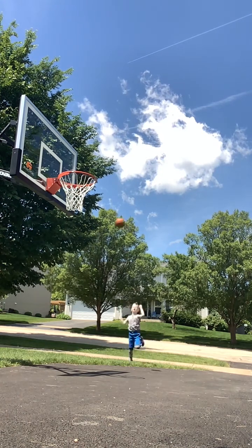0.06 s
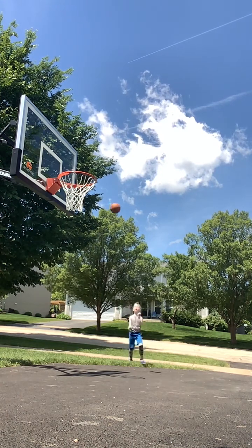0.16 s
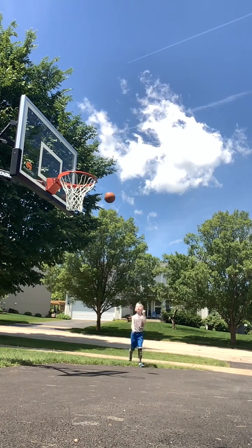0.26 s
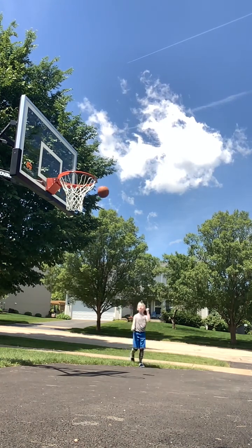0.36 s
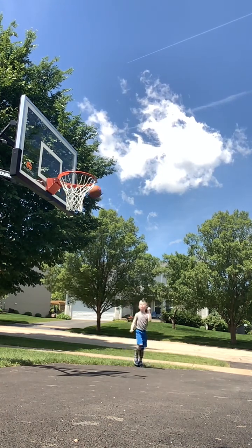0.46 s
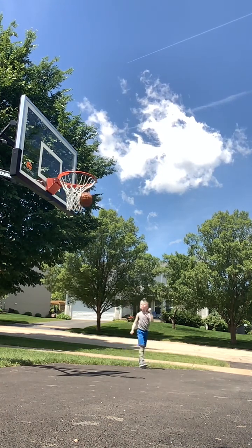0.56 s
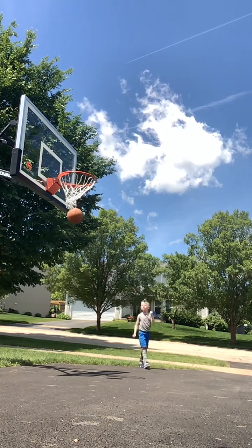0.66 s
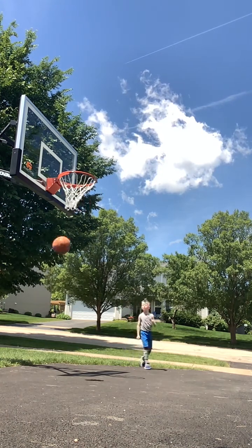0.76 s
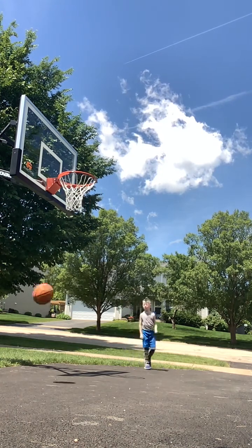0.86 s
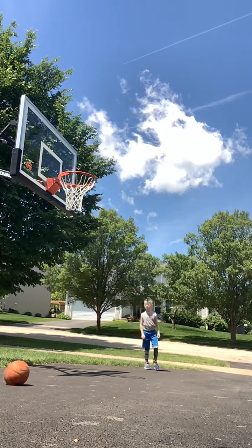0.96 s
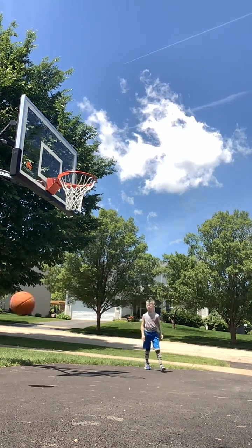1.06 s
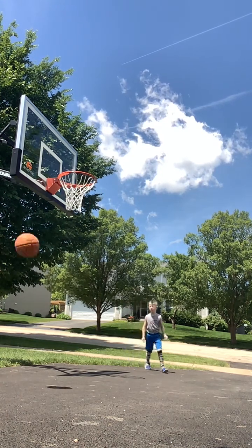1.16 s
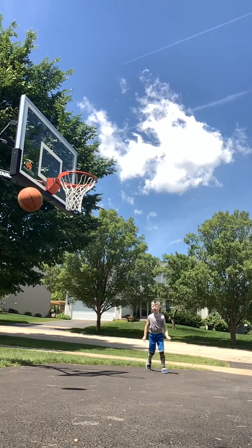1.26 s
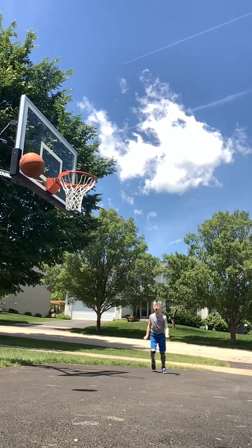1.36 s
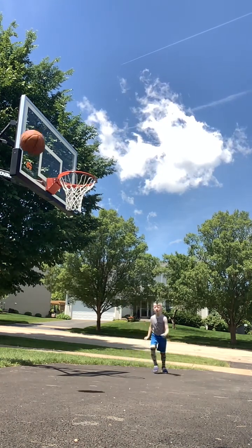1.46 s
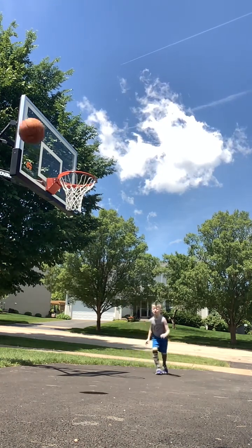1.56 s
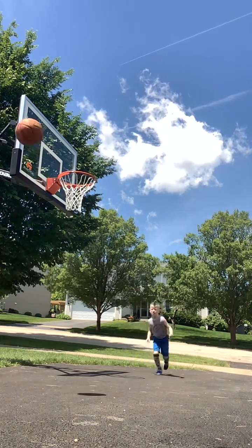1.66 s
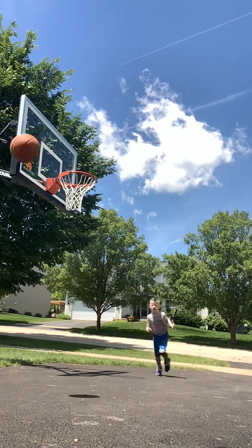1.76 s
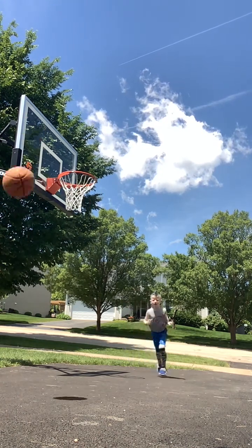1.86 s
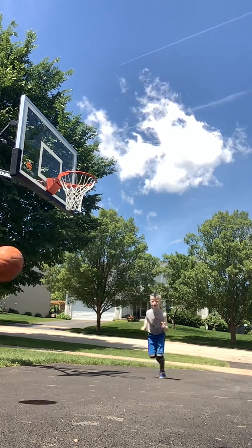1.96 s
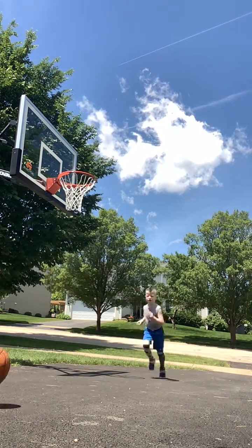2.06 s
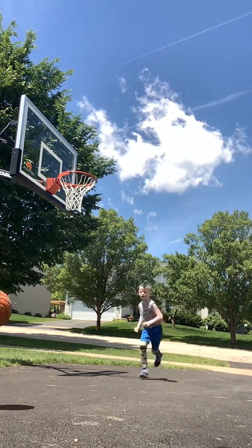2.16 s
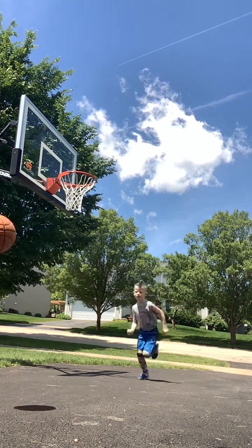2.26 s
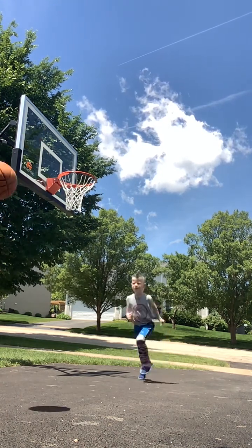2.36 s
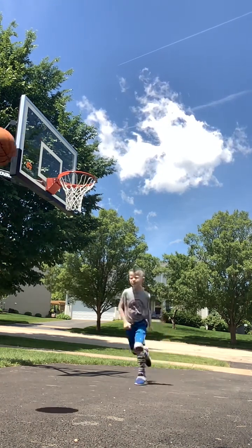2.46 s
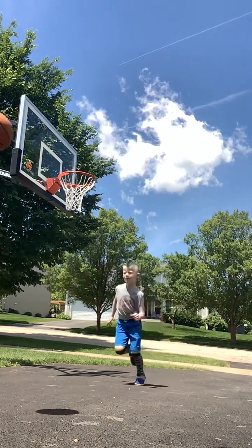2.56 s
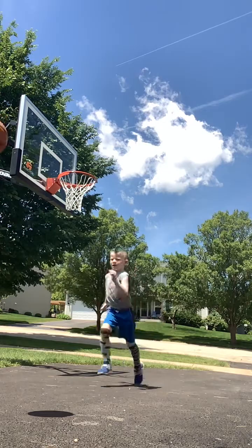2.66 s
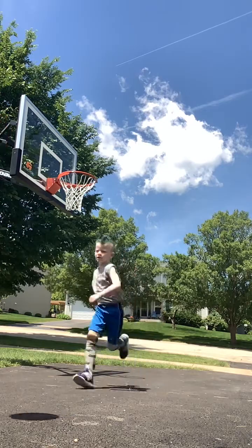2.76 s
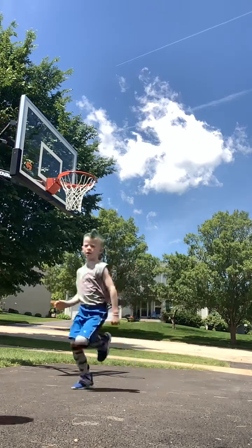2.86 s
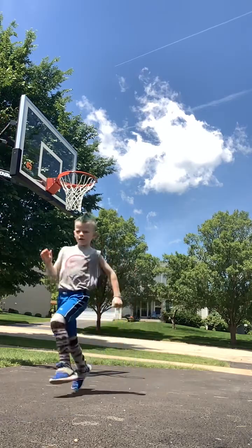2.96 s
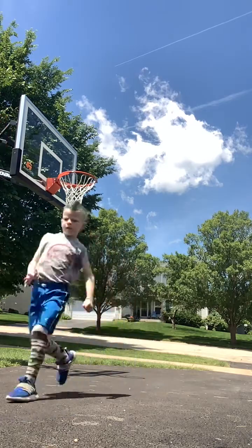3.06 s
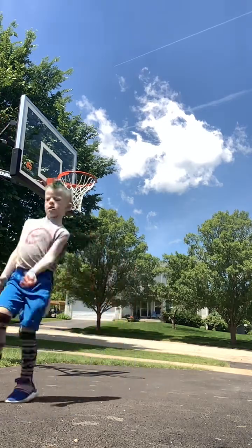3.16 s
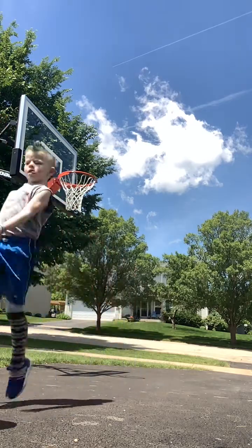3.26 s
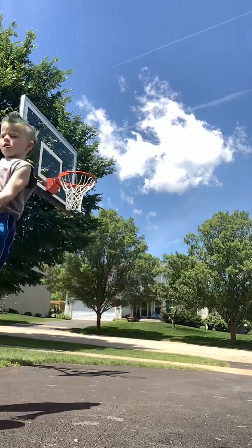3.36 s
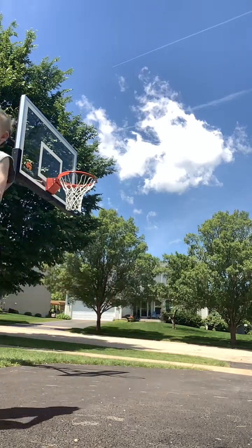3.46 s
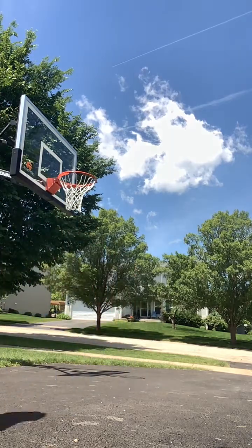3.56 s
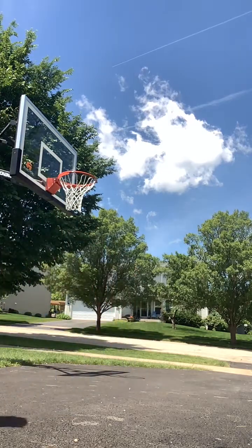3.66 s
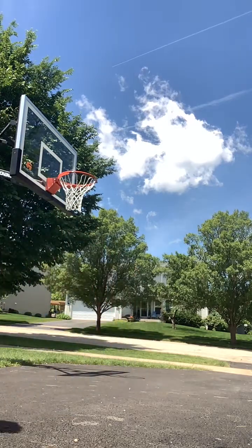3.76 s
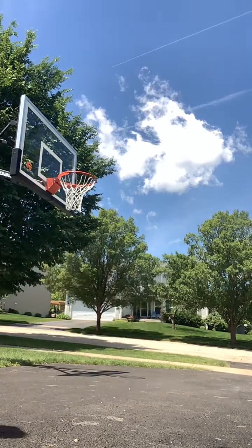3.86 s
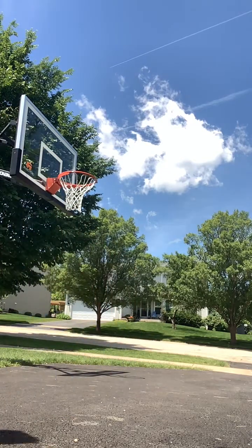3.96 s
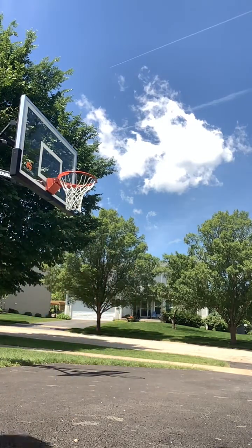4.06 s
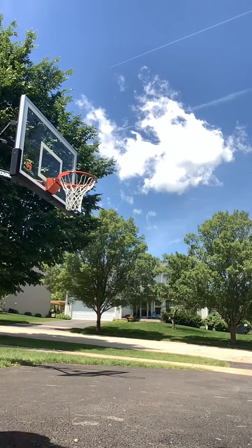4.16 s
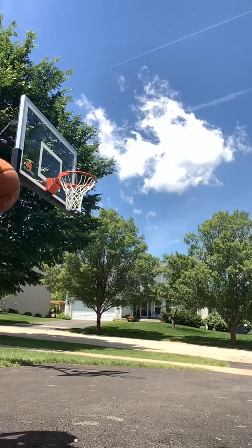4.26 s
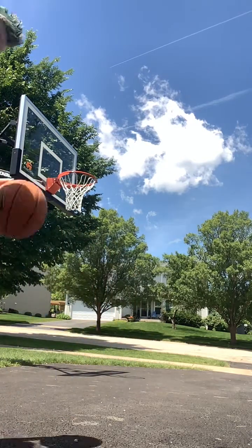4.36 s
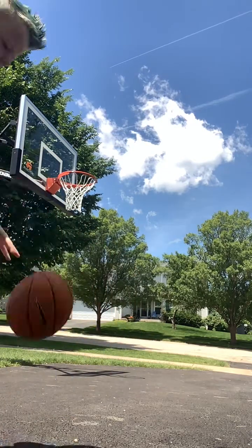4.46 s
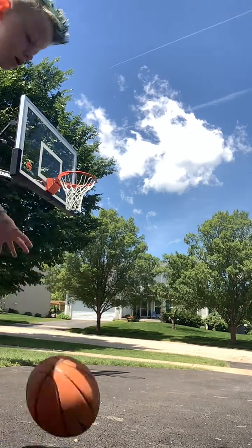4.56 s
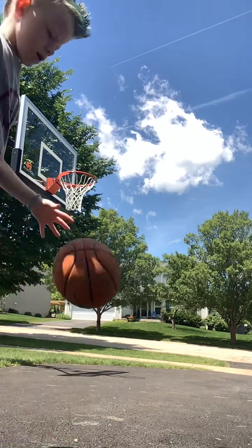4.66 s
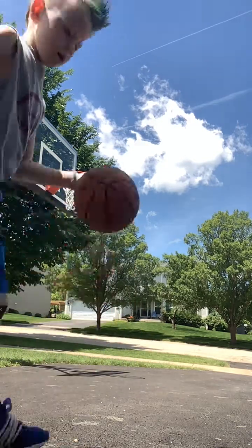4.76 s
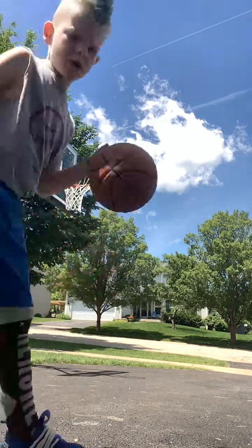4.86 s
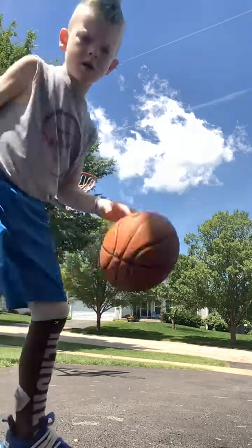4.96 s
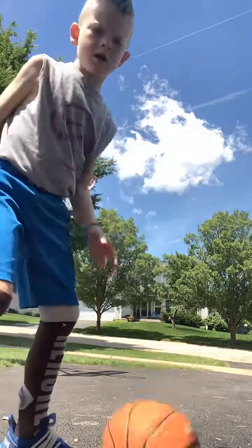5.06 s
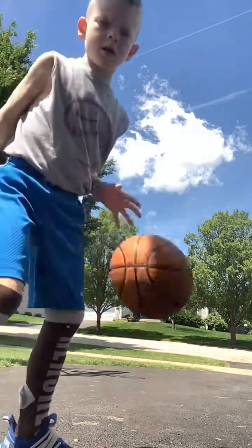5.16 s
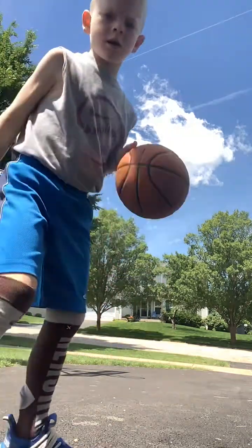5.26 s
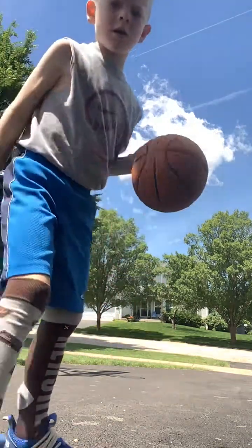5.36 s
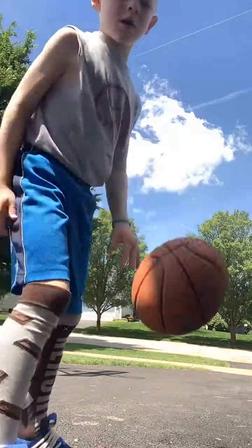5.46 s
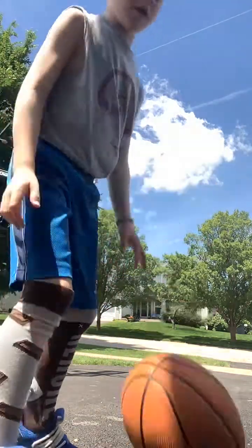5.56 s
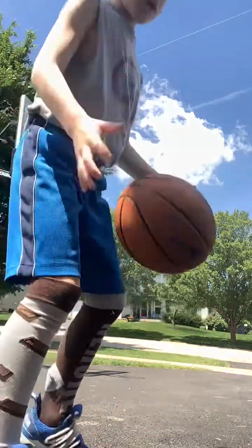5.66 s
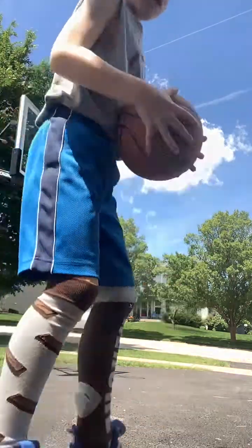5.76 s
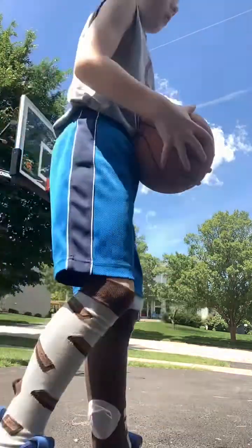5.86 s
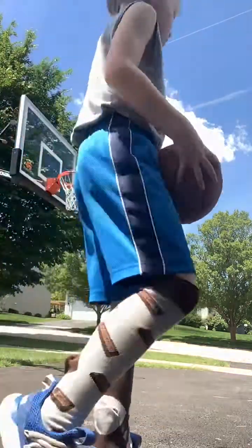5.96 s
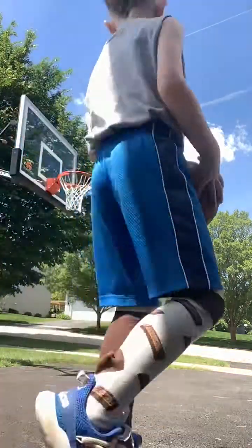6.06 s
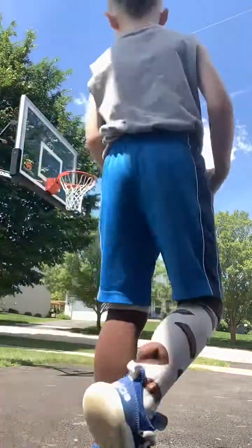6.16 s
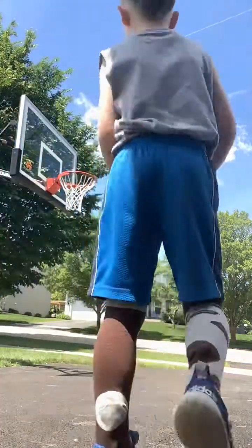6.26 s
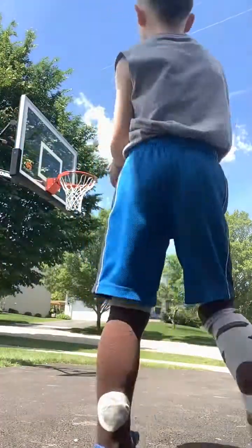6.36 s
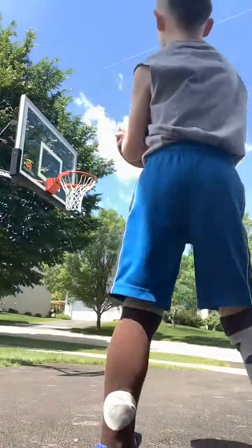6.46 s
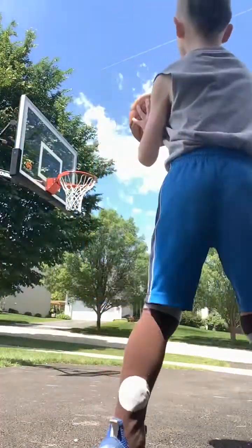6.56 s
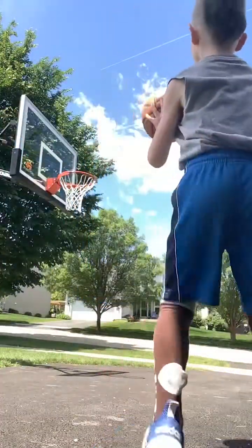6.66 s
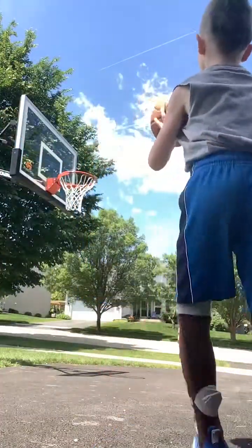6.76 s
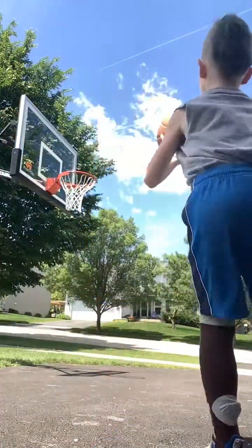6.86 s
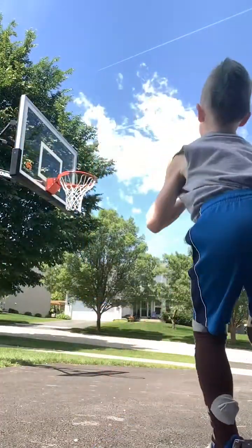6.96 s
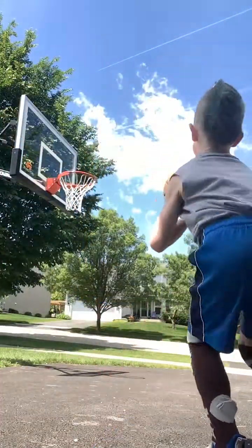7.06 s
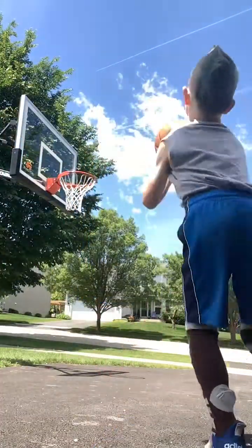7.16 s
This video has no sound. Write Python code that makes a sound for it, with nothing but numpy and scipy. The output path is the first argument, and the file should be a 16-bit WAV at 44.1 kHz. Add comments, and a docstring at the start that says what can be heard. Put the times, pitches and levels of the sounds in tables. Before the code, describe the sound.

A close microphone near the ground hears a basketball landing loudly on asphalt, first in spaced bounces, then in faster dribbles half a second apart. Between them come grit ticks, light footfalls, a gritty skid and a sharp sole slap. Palms pat the ball and catch it with a bright smack. Soft steps follow. Behind are thin gliding bird notes, rustling hiss, low distant traffic and a wavering hum.

```python
"""Driveway by a house: a basketball brushes through a net, bounces on asphalt, is dribbled and caught.
Each bounce is a noise slap, a fast falling thump, a hollow ring and a ping of air modes.
Coloured noise bursts make the net, grit, shoes, cloth and hands; noise echoes stand for the house fronts.
Behind: gliding songbird whistles, a soft rustling hiss, distant traffic noise and a faint wavering hum.
"""
import sys
import numpy as np
from scipy import signal
from scipy.fft import rfft, irfft
from scipy.io import wavfile
from scipy.ndimage import uniform_filter1d

SR = 44100
rng = np.random.default_rng(int(sys.argv[2]) if len(sys.argv) > 2 else 0)


def file_out(sig):
    """Save sig as 16-bit WAV at sys.argv[1]."""
    # one column per channel
    cols = np.atleast_2d(sig).T
    # limit, then scale
    lim = np.clip(cols, -1, 1)
    pcm = np.round(lim * 32767).astype(np.int16)
    wavfile.write(sys.argv[1], SR, pcm)


N = 318843
TIME = np.arange(N) / SR  # s, whole scene
AGE = TIME[:int(.7 * SR)]  # s since the start of one event


def undb(db):
    """Decibels to gain."""
    return 10 ** (np.asarray(db) / 20)


def unit(x):
    """Scale to rms 1."""
    return x / np.sqrt(np.mean(x ** 2))


def add(out, start_s, x):
    """Mix a sound in at a time, cut at the end of the buffer."""
    i = int(start_s * SR)
    out[i:i + len(x)] += x[:len(out) - i]


def curve(rows, axis):
    """One column of a timed table, joined by straight lines."""
    columns = np.transpose(rows)
    return np.interp(TIME, columns[0], columns[axis])


def noise(colour, size):
    """Noise of rms 1, its spectrum shaped by (freq_hz, level_db) points on a log frequency axis."""
    hz, db = np.transpose(colour)
    freq_hz = np.maximum(np.fft.rfftfreq(size, 1 / SR), 1)
    gain = undb(np.interp(np.log(freq_hz), np.log(hz), db))
    return unit(irfft(rfft(rng.standard_normal(size)) * gain, size))


def walk(rate_hz, size):
    """Smooth random drift with a spread of about 1: held random values, averaged twice."""
    hold = max(int(SR / rate_hz), 2)
    held = np.repeat(rng.standard_normal(size // hold + 2), hold)
    return unit(uniform_filter1d(uniform_filter1d(held, hold), hold))[:size]


def burst(colour, fade_s, rise_s=1 / 8000, grain_db=0):
    """A contact: coloured noise that rises and dies, with a set energy, lumpy if grainy."""
    shape = (1 - np.exp(-AGE / rise_s)) * np.exp(-AGE / fade_s)
    x = noise(colour, len(AGE)) * shape * undb(grain_db * walk(900, len(AGE)))
    return unit(x) * np.sqrt(np.mean(shape ** 2))


def swell(peak_s):
    """Envelope that grows to 1 at the peak time and dies away."""
    return AGE / peak_s * np.exp(1 - AGE / peak_s)


def ring(freq_hz, t60_s):
    """One struck mode: a sine with exponential decay."""
    return np.sin(2 * np.pi * freq_hz * AGE) * np.exp(-np.log(1000) * AGE / t60_s)


# distant traffic colour: freq_hz, level_db
TRAFFIC_COLOUR = [(24, -62), (40, -19.5), (103, -1), (209, -9.5), (268, -14), (303, -12.5), (332, -19.5),
                  (411, -20), (449, -25), (490, -22), (2110, -36), (2800, -40), (3640, -46), (6160, -120)]
# background level over time: start_s, traffic_db, hum_db (hum before its random waver)
STREET_LEVELS = [(0, -43.5, -57), (.7, -45, -56), (1.5, -44.5, -51.5), (2.6, -44.5, -51), (3.9, -46, -46.5),
                 (5.0, -43, -44.5), (5.9, -42.5, -42), (6.3, -45, -44.5), (7.23, -45, -49)]


def traffic():
    """Distant traffic: mostly low coloured noise with a slowly changing level."""
    return noise(TRAFFIC_COLOUR, N) * undb(curve(STREET_LEVELS, axis=1))


def motor_hum(hum_hz=98):
    """Far motor: three harmonics that waver together in pitch and level."""
    phase = 2 * np.pi * np.cumsum(hum_hz * (1 + 0.023 * walk(4, N))) / SR
    hum = np.sin(phase) + undb(-22) * np.sin(2 * phase) + undb(-21.5) * np.sin(3 * phase)
    return undb(curve(STREET_LEVELS, axis=2) + 2.7 * walk(7, N)) * hum


# rustling hiss colour: freq_hz, level_db
RUSTLE_COLOUR = [(1000, -15.5), (2700, -0.5), (4200, 3), (5500, 0.5), (7000, 0), (8500, -14),
                 (11000, -18.5), (16000, -23.5)]
# rustle level over time, before the trim: start_s, level_db
RUSTLE_LEVELS = [(0.0, -62.5), (0.2, -65.5), (0.97, -66), (1.21, -60), (1.39, -67.5), (2.15, -61),
                 (2.29, -55), (2.54, -63), (3.4, -61), (3.6, -60), (3.89, -61.5), (5.94, -56),
                 (6.14, -62.5), (6.52, -54.5), (6.7, -60), (7.23, -60)]


def rustle(trim_db=-1.0):
    """Soft rustling hiss, with swells like cloth or shoes brushing; each third octave flickers alone."""
    hiss = rfft(noise(RUSTLE_COLOUR, N))
    freq_hz = np.clip(np.fft.rfftfreq(N, 1 / SR), 2000, 16000)
    thirds = 3 * np.log2(freq_hz / 2000)
    flicker = np.zeros(N)
    for k in range(10):
        band = irfft(hiss * np.maximum(1 - np.abs(thirds - k), 0), N)
        flicker += band * undb(2.2 * walk(16, N))
    return flicker * undb(curve(RUSTLE_LEVELS, axis=1) + trim_db)


def whistle(length_s, pitch_hz, shape):
    """One rough gliding note; shape holds the pitch ratios at start, middle and end."""
    u = np.linspace(0, 1, int(length_s * SR))
    glide_hz = pitch_hz * np.polyval(np.polyfit([0, .5, 1], shape, 2), u)
    glide_hz = glide_hz * (1 + .014 * walk(700, len(u)))
    level = undb(2 * walk(110, len(u))) * np.sqrt(np.abs(np.sin(np.pi * u)))
    return level * np.sin(2 * np.pi * np.cumsum(glide_hz) / SR)


def trees(x, fade_s):
    """Sound scattered by trunks and leaves: convolution with decaying noise."""
    scatter = rng.standard_normal(len(AGE)) * np.exp(-AGE / fade_s)
    return signal.fftconvolve(x, scatter / np.linalg.norm(scatter))[:N]


# high notes that rise quickly, then level off: start_s, reference_pitch_hz, level_db
SEET_NOTES = [(.03, 5550, -61), (.352, 6230, -57), (1.6, 5240, -57.5), (3.28, 5450, -50),
              (3.626, 5500, -51), (4.05, 5350, -51), (5.345, 5540, -44), (5.87, 5500, -46),
              (6.32, 5490, -50), (7.14, 5510, -51)]
SEET_S, SEET_SHAPE = .07, (.9, 0.99, 0.98)
# falling notes: start_s, length_s, reference_pitch_hz, level_db
SLUR_NOTES = [(2.405, 0.041, 2940, -53), (2.576, .05, 2880, -56), (3.713, .06, 3510, -55),
              (3.97, 0.16, 2790, -56), (4.428, 0.1, 4350, -50.5), (4.662, 0.071, 4470, -55),
              (4.971, .063, 2850, -49), (5.707, 0.037, 3110, -50), (6.005, 0.047, 2850, -50.5),
              (6.149, 0.027, 4880, -52), (6.299, 0.064, 4440, -49.5), (6.399, 0.067, 3000, -48.5),
              (6.62, 0.052, 2906, -48)]
SLUR_SHAPE = (1.2, 0.99, .85)
# gently rising notes: start_s, middle_pitch_hz, level_db
CHIRP_NOTES = [(3.35, 4110, -56), (3.92, 3890, -58.5), (4.09, 4000, -52), (4.8, 5100, -53),
               (5.19, 3420, -50), (5.9, 2767, -49.5)]
CHIRP_S, CHIRP_SHAPE = .065, (0.94, 1, 1.03)


def near_bird():
    """A songbird whistles notes that rise quickly and level off, that fall, or that rise gently."""
    out = np.zeros(N)
    for start_s, pitch_hz, level_db in SEET_NOTES:
        add(out, start_s, undb(level_db) * whistle(SEET_S, pitch_hz, SEET_SHAPE))
    for start_s, length_s, pitch_hz, level_db in SLUR_NOTES:
        add(out, start_s, undb(level_db) * whistle(length_s, pitch_hz, SLUR_SHAPE))
    for start_s, pitch_hz, level_db in CHIRP_NOTES:
        add(out, start_s, undb(level_db) * whistle(CHIRP_S, pitch_hz, CHIRP_SHAPE))
    return out


def far_birds(count=130, first_db=-64.5, last_db=-57):
    """Distant twitter: short random glides that grow denser and louder with time."""
    out = np.zeros(N)
    for k, (late, length, height, bend, glide) in enumerate(rng.random((count, 5))):
        shape = (1, .8 + .3 * bend, .6 + .6 * glide)
        note = whistle(.02 + .045 * length, 3200 + 2600 * height, shape)
        progress = np.sqrt((k + late) / count)
        level_db = np.interp(progress, [0, 1], [first_db, last_db])
        add(out, progress * N / SR, undb(level_db) * note)
    return out


def birds(direct_db=-1, scatter_db=-1.9):
    """Near and far song, each heard both directly and scattered by the trees."""
    song = near_bird() + far_birds()
    return undb(direct_db) * song + undb(scatter_db) * trees(song, fade_s=0.075)


# echo colour: freq_hz, level_db
ECHO_COLOUR = [(60, 1.5), (200, 4), (600, 0.5), (1500, -0.5), (3000, 8), (6500, 5), (9500, 4), (12000, -9),
               (16000, -6.5)]


def yard(x, wet_db, t60_s=0.62, wall_s=.058, wall_db=-4, wall_hz=900):
    """House-front echo: a decaying noise tail and one dull, low-passed slap back from a wall."""
    decay = np.exp(-np.log(1000) * AGE / t60_s) * (1 - np.exp(-AGE / .008))
    tail = noise(ECHO_COLOUR, len(AGE)) * decay
    response = tail / np.linalg.norm(tail)
    b, a = signal.butter(1, wall_hz, fs=SR)
    wall = signal.lfilter(b, a, signal.unit_impulse(len(AGE)))
    add(response, wall_s, undb(wall_db) * wall)
    return x + undb(wet_db) * signal.fftconvolve(x, response)[:len(x)]


# ball brushing the net: start_s, level_db
NET_BRUSHES = [(.511, -30), (.534, -30.5)]


def net():
    """The cords rasp over the falling ball: grainy noise bursts."""
    out = np.zeros(N)
    cord = [(150, -3), (550, 7.0), (1000, 4), (1650, 8.5), (2600, -11.0), (4500, -16.5),
            (7000, -10), (10000, -28.5), (16000, -35)]  # freq_hz, level_db
    for start_s, level_db in NET_BRUSHES:
        add(out, start_s, undb(level_db) * burst(cord, .02, .012, grain_db=2))
    return out


# pebble tick colour: freq_hz, level_db
PEBBLE_COLOUR = [(800, -18), (2300, -26), (3050, 6), (3900, -34), (5500, -13), (7200, -3.5), (9000, -18.5),
                 (12000, -23.5), (16000, -41)]
# skipping stones: start_s, level_db
GRIT_SKIPS = [(0.37, -52.5), (1.21, -42.5), (1.32, -28.5), (1.838, -37.5), (1.863, -26), (2.288, -33.5),
              (2.306, -32.5)]


def grit():
    """Small stones tick on the asphalt, hop once and leave a short bright hiss."""
    out = np.zeros(N)
    hiss = [(1500, -16), (3000, 13), (5000, 9), (7500, 13), (10000, -2), (12500, -18),
            (16000, -20)]  # freq_hz, level_db
    for start_s, level_db in GRIT_SKIPS:
        tick = burst(PEBBLE_COLOUR, 0.0047, 0.00043)
        add(out, start_s, undb(level_db) * (tick + undb(-22.0) * burst(hiss, 0.048, 0.017)))
        add(out, start_s + 0.017, undb(level_db - 5.0) * burst(PEBBLE_COLOUR, 0.00081, 0.00025))
    return out


# sole thud colour: freq_hz, level_db
SOLE_COLOUR = [(50, -16), (120, -2.5), (240, -5.5), (400, 5), (700, -9.5), (1250, -8), (1600, -13.5),
               (2600, -25), (5000, -31), (16000, -60)]
# ground sand colour: freq_hz, level_db
SAND_COLOUR = [(500, -4.5), (1500, 0), (3000, -2), (4500, -0.5), (7000, 2.5), (9000, -5), (12000, -15),
               (16000, -22)]


def footfall(thud_db, sand_db, fade_s, rise_s):
    """A sole thuds and grinds sand: a dull burst plus a grainy bright one."""
    thud = undb(thud_db) * burst(SOLE_COLOUR, fade_s, rise_s)
    return thud + undb(sand_db) * burst(SAND_COLOUR, fade_s, rise_s, grain_db=3)


# hollow pat colour: freq_hz, level_db
PAT_COLOUR = [(50, -17), (120, 6.5), (240, -5.5), (400, -4), (750, -9.5), (1100, -15), (1600, -13),
              (2600, -23), (5000, -32), (16000, -51)]
# footfalls: start_s, thud_db, sand_db
FOOTFALLS = [(1.899, -30.5, -60), (2.463, -32.5, -56), (2.779, -36.5, -57), (3.521, -35, -39),
             (3.534, -27, -29), (4.004, -40.5, -53), (4.396, -36, -35.5), (5.404, -38.5, -39.5),
             (6.46, -40, -43), (6.773, -44, -45.5), (6.958, -25, -46)]
# soft scuffs and rustles, soles on sand and a shirt at 5.9 s: start_s, fade_s, level_db
SOFT_SCUFFS = [(2.831, .035, -51), (3.492, 0.011, -40), (3.605, 0.11, -46), (5.47, .08, -49),
               (5.79, 0.046, -53), (5.9, 0.045, -51.5), (7.191, .051, -50.5)]
STEP_FADE_S, TOE_LATE_S, TOE_DB = .006, .008, -1  # toe follows heel
SKID_S, SKID_THUD_DB, SKID_SAND_DB = 3.548, -23.5, -30  # the run ends in a skid
STAMP_S, STAMP_DB = 3.583, -17  # then the sole slaps flat


def steps_and_scuffs():
    """Heel and toe land in turn; grainy soft scuffs of soles and a shirt; a skid and a stamp."""
    out = np.zeros(N)
    for start_s, thud_db, sand_db in FOOTFALLS:
        add(out, start_s, footfall(thud_db, sand_db, STEP_FADE_S, 0.00093))
        toe = footfall(thud_db, sand_db, 0.0057, 0.00078)
        add(out, start_s + TOE_LATE_S, undb(TOE_DB) * toe)
    for start_s, fade_s, level_db in SOFT_SCUFFS:
        add(out, start_s, undb(level_db) * burst(SAND_COLOUR, fade_s, fade_s / 7, grain_db=4))
    add(out, SKID_S, undb(SKID_THUD_DB) * burst(PAT_COLOUR, 0.017, 0.0058))
    add(out, SKID_S, undb(SKID_SAND_DB) * burst(SAND_COLOUR, 0.015, .005, grain_db=7))
    add(out, STAMP_S, undb(STAMP_DB) * footfall(0, -8.5, 0.0014, 0.00016))
    return out


# air modes inside the ball: freq_hz, level_db, t60_s
AIR_MODES = [(1303, 1, 0.59), (1500, 3.5, .25), (2040, -11.5, 0.56), (2790, -2.5, .45), (3386, -14, 0.39),
             (3800, -20, .9), (4400, -14.5, .4), (4900, -15, .41), (5400, -15.5, .35), (5870, -15, .7),
             (6215, -12, .35), (6360, -10.5, 0.4)]


def ping():
    """The air inside the ball rings, its mode levels a little different for every blow."""
    out = np.zeros(len(AGE))
    for freq_hz, level_db, t60_s in AIR_MODES:
        out += undb(level_db + 2 * rng.standard_normal()) * ring(freq_hz, t60_s)
    return out


# skin clap colour: freq_hz, level_db
CLAP_COLOUR = [(500, -9.5), (2000, -22.5), (4000, -17), (5500, -8), (7100, 2.5), (8000, -6.5), (10000, -20),
               (12200, -20.5), (16000, -35)]
# held ball modes: freq_hz, level_db, t60_s
KNOCK_MODES = [(140, 0, .05), (606, -1, .05), (787, 0, .055)]
# hands touching the ball: start_s, fade_s, pat_db, clap_db
HAND_TOUCHES = [(4.778, .02, -40, -61), (5.275, 0.015, -39, -46.5), (5.731, .012, -34.5, -42),
                (5.743, 0.017, -25.5, -33.5)]
CATCH_S, CATCH_DB, CATCH_FADE_S = 5.7574, -1, .0026  # the palm claps on the ball
KNOCK_LATE_S, KNOCK_DB = .008, -19  # the ball knocks between both hands


def hands():
    """Palms pat the hollow ball while dribbling, then catch it with a clap and a knock."""
    out = np.zeros(N)
    knock = sum(undb(level_db) * ring(freq_hz, t60_s) for freq_hz, level_db, t60_s in KNOCK_MODES)
    for start_s, fade_s, pat_db, clap_db in HAND_TOUCHES:
        pat = burst(PAT_COLOUR, fade_s, 0.00046) + undb(-4.5) * knock + undb(-41.0) * ping()
        add(out, start_s, undb(pat_db) * pat)
        add(out, start_s, undb(clap_db) * burst(CLAP_COLOUR, fade_s, 0.001))
    add(out, CATCH_S, undb(CATCH_DB) * burst(CLAP_COLOUR, CATCH_FADE_S, .001))
    held = undb(2.0) * knock + undb(-1.5) * burst(PAT_COLOUR, 0.0097, .0015) + undb(-37) * ping()
    add(out, CATCH_S + KNOCK_LATE_S, undb(KNOCK_DB) * held)
    return out


def thump(pitch_ratio, start_hz=607, end_hz=91.8, fall_s=0.00512, peak_s=0.0061):
    """The ball flattens and springs back: a fast falling tone."""
    hz = pitch_ratio * (end_hz + (start_hz - end_hz) * np.exp(-AGE / fall_s))
    return np.sin(2 * np.pi * np.cumsum(hz) / SR) * swell(peak_s) ** 1.21


def snap(top_hz, end_hz, fall_s=0.001704, peak_s=0.0011):
    """Ripples race round the skin, the high ones first: a very fast downward chirp."""
    hz = end_hz + (top_hz - end_hz) * np.exp(-AGE / fall_s)
    return np.sin(2 * np.pi * np.cumsum(hz) / SR) * swell(peak_s)


# rubber slap colour: freq_hz, level_db
SLAP_COLOUR = [(200, -40), (430, -6.5), (900, 2), (1100, -5.5), (1550, 1.5), (2100, -3), (2700, -4),
               (3900, -4.5), (8000, -19), (16000, -56.5)]
ABOVE_EDGE_DB = -12  # slap treble beyond its bright range


def slap(tone_hz, edge_hz, contact_s):
    """Rubber slaps and rings briefly, snaps back at lift-off, dulled above the edge; ripples on top."""
    landing = undb(-1.0) * burst(SLAP_COLOUR, 0.0031)
    landing += undb(-10.5) * burst(SLAP_COLOUR, 0.012, 0.00077)
    landing += undb(-3.5) * ring(tone_hz, 0.024)
    lift_off = undb(-10.5) * burst(SLAP_COLOUR, .0028) + undb(-10.5) * ring(tone_hz, 0.028)
    add(landing, contact_s, lift_off)
    body = signal.sosfilt(signal.butter(8, edge_hz, fs=SR, output="sos"), landing)
    treble = signal.sosfilt(signal.butter(4, edge_hz, "high", fs=SR, output="sos"), landing)
    ripples = undb(.5) * snap(1.101 * edge_hz, .35 * tone_hz)
    return undb(3) * (body + undb(ABOVE_EDGE_DB) * treble) + ripples


# grit crack colour: freq_hz, level_db
CRACK_COLOUR = [(1000, -3.5), (3000, -1), (4400, -6.5), (5600, 10), (6600, 14), (7600, 0), (9500, -18.5),
                (16000, -71.5)]
# slap thrown back by foliage: freq_hz, level_db
SCATTER_COLOUR = [(2000, -11.5), (3100, 2), (4500, -1), (5500, -4.5), (7000, -2), (8600, -8.5),
                  (11000, -24), (16000, -38.5)]
# ball on asphalt: start_s, thump_db, pitch_ratio, distance_m (sets echo, scatter and ping),
# slap_db, slap_tone_hz, slap_edge_hz, crack_db, hollow_db
BALL_BOUNCES = [(0.9547, -0.5, 1.044, 1.95, -11, 1813, 3290, -18.5, -10.5),
                (2.1043, -3, .98, 1.85, -13, 1838, 4090, -15.5, -13),
                (3.0552, -4.5, .95, 1.74, -15.5, 1656, 2210, -13.5, -17),
                (4.5566, -1.5, 0.97, 1.13, -12.5, 1847, 2900, -13.5, -7.5),
                (5.0697, 0, .99, 0.78, -7.3, 1558, 3220, -10, -15),
                (5.5434, .5, 1.04, 0.83, -9.5, 1390, 3190, -21.5, -9.5)]
SHELL_DB, SHELL_DB_PER_OCTAVE = -7.5, 83  # a harder landing raises the pitch and flexes the shell more
ECHO_DB, PING_DB = -29.5, -46  # at 1 m; further off there is more echo and less ping
SCATTER_DB = -38  # relative to slap_db, at 1 m


def bounces(contact_s=.0083, lowest_air_hz=614, shell_hz=285):
    """Slap, thump, shell flex and grit crack on landing; the lowest air mode rings at lift-off."""
    out = np.zeros(N)
    for row in BALL_BOUNCES:
        start_s, thump_db, pitch_ratio, distance_m, slap_db, tone_hz, edge_hz, crack_db, hollow_db = row
        shell = np.sin(2 * np.pi * pitch_ratio * shell_hz * AGE) * swell(0.0046)
        shell_db = SHELL_DB + SHELL_DB_PER_OCTAVE * np.log2(pitch_ratio)
        ball = undb(thump_db) * thump(pitch_ratio) + undb(shell_db) * shell
        ball += undb(slap_db) * slap(tone_hz, edge_hz, contact_s)
        ball += undb(crack_db) * burst(CRACK_COLOUR, 0.002)
        add(ball, contact_s, undb(hollow_db) * ring(lowest_air_hz, 0.073))
        distance_db = 20 * np.log10(distance_m)
        scatter_db = SCATTER_DB + slap_db + distance_db
        add(out, start_s, undb(scatter_db) * burst(SCATTER_COLOUR, .055, .01))
        add(out, start_s, yard(ball, ECHO_DB + distance_db))
        add(out, start_s, undb(PING_DB - 1.7 * distance_db) * ping())
    return out


def scene():
    """The neighbourhood, the small sounds echoed by the yard, and the bouncing ball."""
    background = traffic() + motor_hum() + rustle() + birds()
    small_sounds = yard(net() + grit() + steps_and_scuffs() + hands(), wet_db=-25)
    return (background + small_sounds + bounces())[None]


def record(dry, ceiling=.95, top_hz=16100):
    """Round the highest peaks, then cut the top with a steep low-pass."""
    rounded = dry / (1 + (dry / ceiling) ** 6) ** (1 / 6)
    return signal.sosfilt(signal.ellip(8, .2, 70, top_hz, fs=SR, output="sos"), rounded)


dry = scene()
out = record(dry)
file_out(out)
```